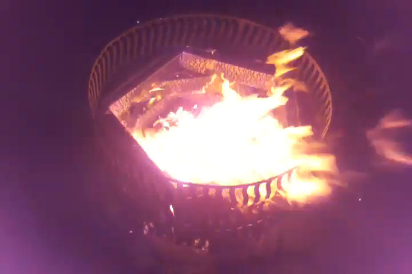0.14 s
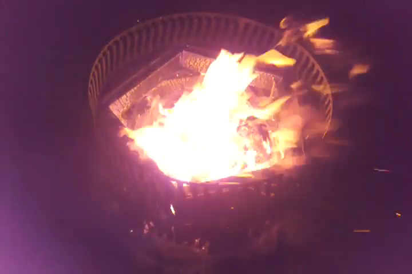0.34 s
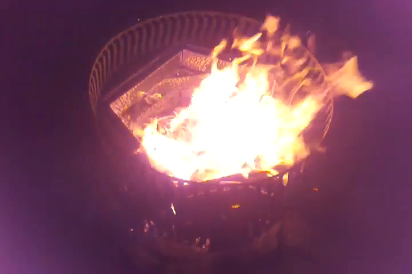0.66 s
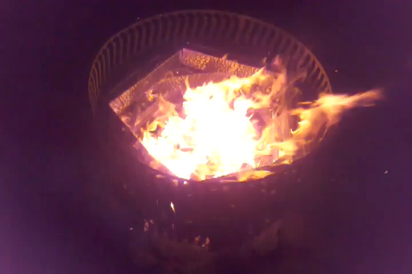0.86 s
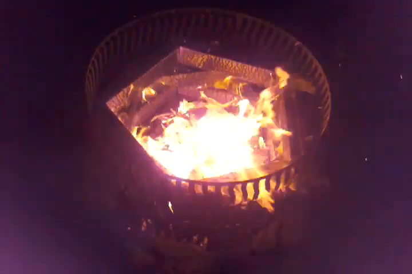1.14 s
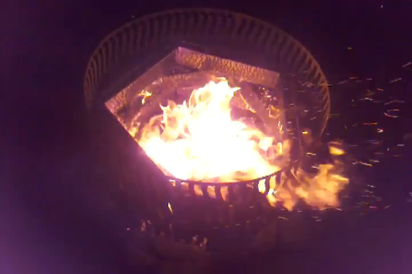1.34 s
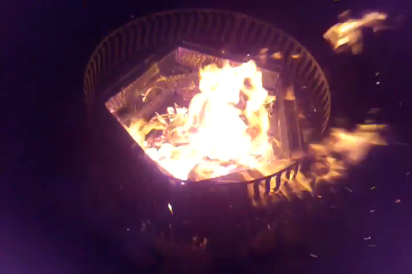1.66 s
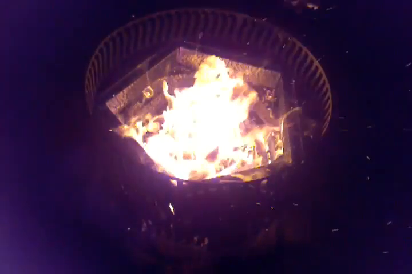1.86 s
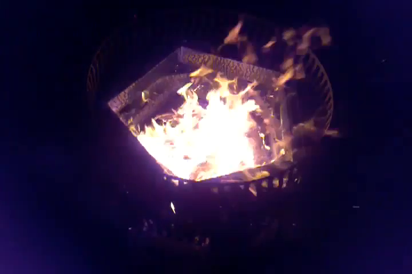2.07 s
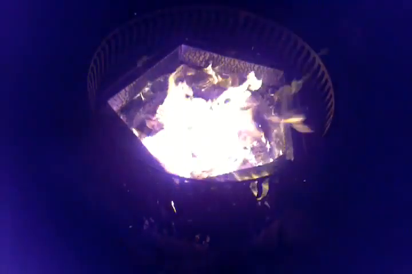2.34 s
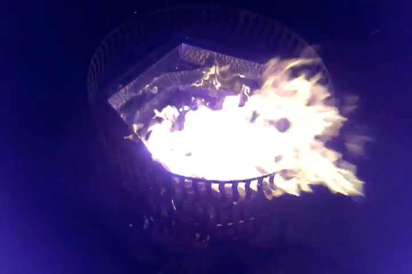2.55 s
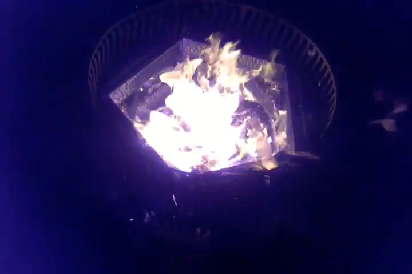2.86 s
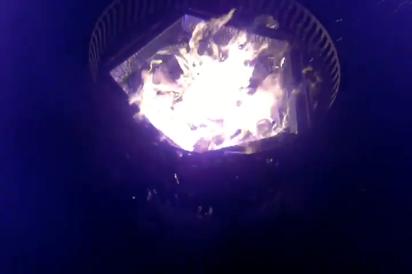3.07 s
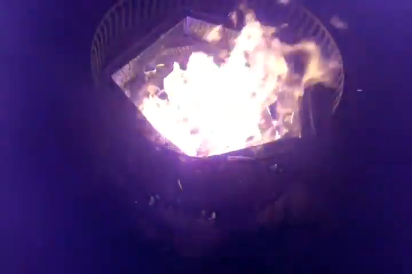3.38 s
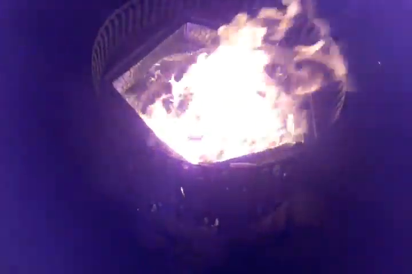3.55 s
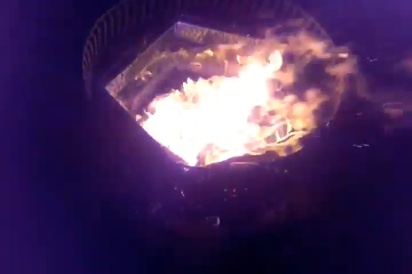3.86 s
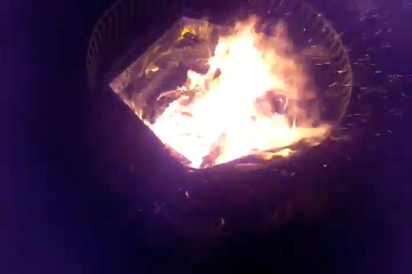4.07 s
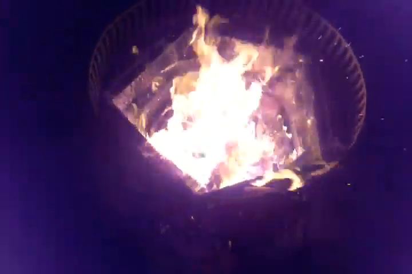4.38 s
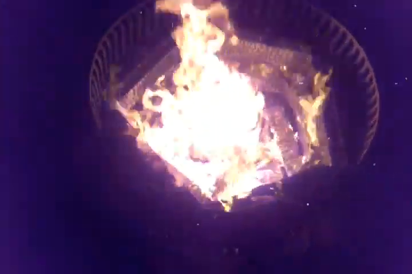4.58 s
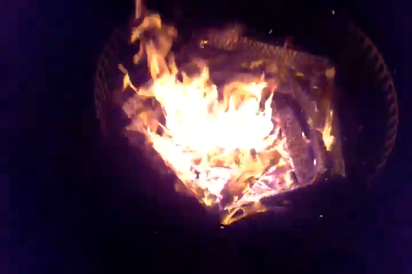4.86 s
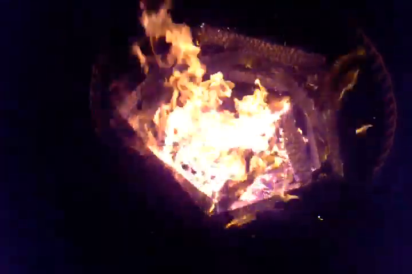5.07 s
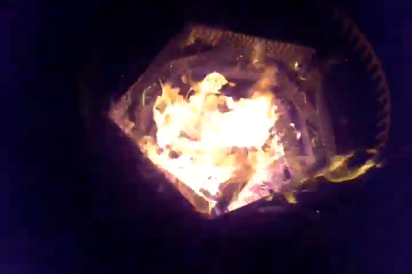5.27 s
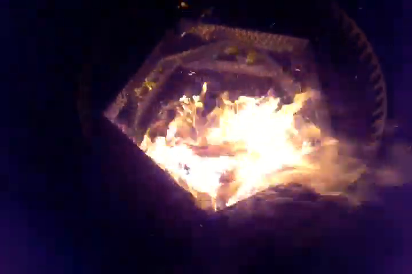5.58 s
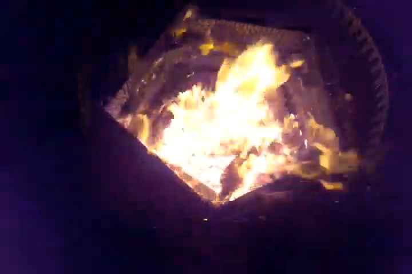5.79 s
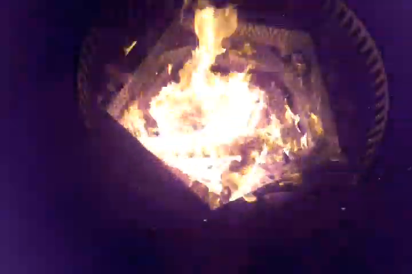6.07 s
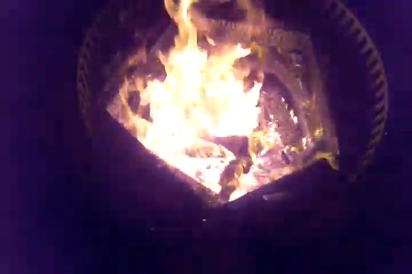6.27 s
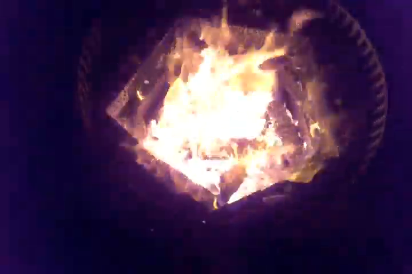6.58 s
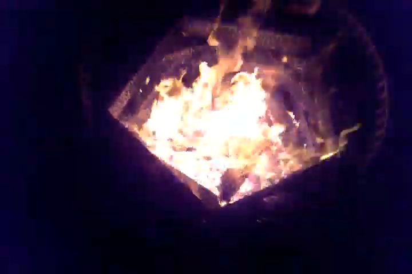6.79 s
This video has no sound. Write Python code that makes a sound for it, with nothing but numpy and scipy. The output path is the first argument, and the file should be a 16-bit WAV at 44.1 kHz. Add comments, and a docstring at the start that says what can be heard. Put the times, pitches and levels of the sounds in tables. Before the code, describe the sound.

Wind strikes a bare stereo microphone close to a burning wood fire outdoors, making irregular low rumbles, flapping thumps and short tearing puffs, heaviest in the middle. Beneath it are a weak low flame flutter and fine high sizzle that gradually grow. Sharp, very short cracks and tiny ticks come irregularly, more often toward the end, with small spurts of hiss. The space is open and nearly dry.

```python
"""Campfire in gusty wind

A wood fire burns in a metal ring outdoors: bursts of noise crack, ticks sizzle, bands of hiss jet
and fluttering low noise makes the flames. Wind buffets two microphone ports, one open and one shaded:
eddy noise read at a varying speed, single vortex thumps and tearing puffs.
Each channel is one port minus the delayed other."""
import sys
import numpy as np
from scipy import signal
from scipy.fft import rfft, irfft
from scipy.io import wavfile
from scipy.ndimage import uniform_filter1d, map_coordinates

SR = 44100
rng = np.random.default_rng(int(sys.argv[2]) if len(sys.argv) > 2 else 0)


def store_pcm(level_fs):
    """Save levels as 16-bit WAV."""
    pcm = np.round(np.clip(level_fs, -1, 1) * 32767).astype(np.int16)
    wavfile.write(sys.argv[1], SR, np.atleast_2d(pcm).T)


N = 305613
TIME = np.arange(N) / SR

# reference levels, offset by each source: (time [s], hiss level [dB], sizzle level [dB])
BED_LEVELS = [(0, -69.5, -80), (0.3, -68.5, -77.5), (0.8, -66.5, -77), (1.4, -63, -76), (2.1, -62, -73.5),
              (2.6, -60, -72.5), (3.1, -59, -68.5), (3.65, -56.5, -66), (3.85, -60, -73), (4.3, -59, -68.5),
              (4.75, -59.5, -70.5), (4.95, -56.5, -65.5), (5.3, -57, -70), (5.7, -58, -67.5),
              (6.1, -57, -68.5), (6.5, -57, -67.5), (6.93, -55, -65.5)]
# relative spectrum of small tearing eddies: (frequency [Hz], level [dB])
TEARING_SPECTRUM = [(200, -26), (500, 17), (900, 13.5), (1500, 1.5), (2200, -8), (3500, -22), (8000, -42.5)]


def gain_of(db):
    """Decibels to an amplitude factor."""
    return 10 ** (np.asarray(db) / 20)


def evened(x):
    """Scales to rms 1."""
    return x / np.sqrt(np.mean(x ** 2) + 1e-20)


def curves(rows):
    """Each column of a table, after the time column, as a curve over TIME."""
    time_s, *columns = np.transpose(rows)
    return [np.interp(TIME, time_s, column) for column in columns]


def read(points, hz):
    """Spectrum table at the given frequencies, interpolated over log frequency."""
    point_hz, level_db = np.transpose(points)
    return np.interp(np.log(hz + 1), np.log(point_hz + 1), level_db)


def add(mix, start_s, sound):
    """Adds a sound to the mix in place, cut at the end."""
    part = mix[max(round(start_s * SR), 0):][:len(sound)]
    part += sound[:len(part)]


def delayed(x, count):
    """Delays by a count of samples, keeping the length."""
    return np.concatenate([np.zeros(count), x[:len(x) - count]])


def coloured(x, points, size=1024):
    """Minimum-phase filter with the given spectrum: causal, so attacks stay sharp."""
    hz = abs(np.fft.fftfreq(size, 1 / SR))
    log_gain = np.log(gain_of(read(points, hz)))
    taps = np.fft.ifft(np.exp(signal.hilbert(log_gain).conj())).real
    return signal.oaconvolve(x, taps[:size // 2])[:len(x)]


def bass_cut(x, hz):
    """Second-order high-pass."""
    return signal.sosfilt(signal.butter(2, hz, "high", fs=SR, output="sos"), x)


def wander(rate_hz):
    """Smooth random curve of rms 1: noise under a Gaussian low-pass."""
    lowpass = np.exp(-(np.fft.rfftfreq(N, 1 / SR) / rate_hz) ** 2)
    return evened(irfft(rfft(rng.standard_normal(N)) * lowpass, N))


def hiss():
    """Self-noise of one microphone: coloured noise at the hiss level."""
    # relative: (frequency [Hz], level [dB])
    hiss_spectrum = [(50, 25.5), (600, -6), (2000, -10), (3800, -5), (5200, 0), (7000, 2), (10500, 4.5),
                     (14000, 5.5)]
    return gain_of(curves(BED_LEVELS)[0]) * evened(coloured(rng.standard_normal(N), hiss_spectrum))


def yard(x, echo_db=-31, tail_db=-28.5, t60_s=0.423):
    """Open air: one weak echo from nearby, then a thin decaying tail."""
    # colour of the echoes: (frequency [Hz], level [dB])
    air_colour = [(1000, -1.5), (3000, -0.5), (4500, -4.5), (8000, 4), (11000, -1.5), (14000, 6.5)]
    t = TIME[:SR // 2]
    echo = evened(rng.standard_normal(len(t)) * np.exp(-abs(t - .019) / 0.0011))
    tail = evened(rng.standard_normal(len(t)) * gain_of(-60 * t / t60_s) * (t > .006))
    response = (gain_of(echo_db) * echo + gain_of(tail_db) * tail) / np.sqrt(len(t))
    return signal.oaconvolve(x, coloured(response, air_colour))[:N]


def airflow():
    """Level [dB] and eddy rate [Hz]: gusts rise, hold and ebb over a swaying breeze, summed in power."""
    # breeze before its offset and sway: (time [s], level [dB])
    breeze_levels = [(0.0, -67), (0.39, -68.5), (1.1, -57.5), (1.19, -50), (1.56, -54), (1.83, -48),
                     (2.3, -55), (2.61, -56), (3.53, -48), (3.66, -49.5), (3.74, -56.5), (4.13, -55.5),
                     (4.92, -49.5), (5.58, -56), (6.54, -56.5), (6.93, -52.5)]
    # gusts: (start [s], hold [s], level at the hold [dB], eddy rate at the hold [Hz])
    gusts = [(0.017, 0.0401, -42, 146.8), (0.627, 0.0609, -31.5, 301), (0.724, 0.0369, -33, 322.5),
             (0.819, 0.0282, -36, 211.1), (0.953, 0.01243, -37, 170.3), (1.025, 0.01315, -35, 180.4),
             (1.056, 0.043, -26, 298.1), (1.172, 0.0563, -29.5, 194), (1.271, 0.0332, -27, 237.1),
             (1.327, 0.1608, -39, 176.4), (1.61, 0.0523, -33, 245.6), (1.679, 0.049, -33.5, 202.1),
             (1.762, 0.0309, -24.5, 302.9), (1.818, 0.0744, -26.5, 218.3), (1.895, 0.05065, -25, 268),
             (1.967, 0.0237, -29.5, 224.8), (2.093, 0.096, -34, 227.7), (2.247, 0.022, -30.5, 230.5),
             (2.271, 0.0137, -26, 232.3), (2.575, 0.0717, -36, 199.1), (2.782, 0.081, -34, 229.3),
             (2.982, 0.0565, -33, 296.9), (3.099, 0.046, -29, 240.6), (3.177, 0.063, -32.5, 245.2),
             (3.325, 0.0448, -33, 193.6), (3.394, 0.0184, -23.5, 219.7), (3.461, 0.1512, -28.5, 215.9),
             (3.648, 0.0417, -35, 249.6), (3.799, 0.038, -28, 319.8), (3.879, 0.076, -35.5, 210.6),
             (4.129, 0.0698, -25.5, 179.5), (4.316, 0.024, -33, 215.2), (4.404, 0.0191, -22.5, 229.8),
             (4.441, 0.02113, -22, 248.9), (4.494, 0.0422, -34.5, 190.2), (4.666, 0.0685, -24, 280.9),
             (4.784, 0.0567, -27.5, 321), (4.925, 0.031, -25.5, 215.1), (4.981, 0.0998, -36, 219.2),
             (5.146, 0.01204, -27, 250.8), (5.181, 0.048, -25.5, 264.8), (6.059, 0.025, -29.5, 234.5),
             (6.782, 0.0661, -34.5, 169.5)]
    breeze_offset_db, breeze_sway_db, breeze_eddy_hz = 10, 2.5, 185.12
    attack_s, release_s = 0.007002, .019
    eddy_law = .2  # exponent of eddy rate against gust amplitude

    breeze_db = curves(breeze_levels)[0] + breeze_offset_db + breeze_sway_db * wander(rate_hz=12.19)
    power = gain_of(breeze_db) ** 2
    weighted_hz = power * breeze_eddy_hz
    for start_s, hold_s, level_db, eddy_hz in gusts:
        rise = np.minimum(TIME - start_s, 0) / attack_s
        ebb = np.maximum(TIME - start_s - hold_s, 0) / release_s
        shape = np.exp(rise - ebb)
        gust = (gain_of(level_db) * shape) ** 2
        power = power + gust
        weighted_hz = weighted_hz + gust * eddy_hz * shape ** eddy_law
    return 10 * np.log10(power), weighted_hz / power


def wind(level_db=0.34, steepness=6.27, lumpy_db=2.0, swirl=.13, low_cut_hz=75):
    """A frozen pattern of eddies is blown past the port: the faster it passes, the brighter the rumble."""
    flow_db, eddy_hz = airflow()
    rest_hz = 400  # corner of the frozen pattern at unit read speed
    spectrum = (1 + (np.fft.rfftfreq(N, 1 / SR) / rest_hz) ** steepness) ** -.5
    eddies = irfft(rfft(rng.standard_normal(N)) * spectrum, N)

    lumps = wander(rate_hz=70.49)  # small swirls are both faster and stronger
    travel = np.cumsum(eddy_hz * np.exp(swirl * lumps)) / rest_hz
    passing = map_coordinates(eddies, [travel % (N - 1)], order=3)
    pressure = bass_cut(passing * gain_of(lumpy_db * lumps), low_cut_hz)

    # level out the slow swings, so that the airflow sets the level
    local_power = uniform_filter1d(uniform_filter1d(pressure ** 2, size=1100), size=800)
    return pressure / np.sqrt(local_power) * gain_of(flow_db + level_db)


def puffs(per_s=170, level_db=-23, spread_db=1.5, decay_s=0.00138):
    """Small eddies tear off at random: decaying noise puffs, louder with airflow level and eddy rate."""
    flow_db, eddy_hz = airflow()
    strengths = gain_of(spread_db * np.minimum(rng.exponential(1, N), 3))
    hits = strengths * (rng.random(N) < per_s / SR)
    envelope = signal.lfilter([1], [1, -np.exp(-1 / (decay_s * SR))], hits)
    tearing = evened(coloured(envelope * rng.standard_normal(N), TEARING_SPECTRUM))
    return gain_of(flow_db + level_db) * (eddy_hz / 300) ** 3 * tearing


def thumps(swing_trim_db=-8.5, core=2.682, wake_trim_db=-26, wake_decay_s=0.00254):
    """A passing vortex pulls, then pushes; the tighter its core, the sharper the flap. Its wake tears."""
    # levels before trims: (time [s], peak level [dB], nominal pitch [Hz], wake offset [dB])
    vortices = [(0.643, -27, 370, 5.5), (0.655, -21, 350, 7), (0.738, -29, 330, 10),
                (0.759, -18.5, 300, 4.5), (1.066, -12.5, 256, 7), (1.074, -18, 300, 3),
                (1.087, -20, 340, 16), (1.094, -14.5, 343, 6), (1.18, -10.5, 235.5, 0),
                (1.291, -16.5, 269, 7), (1.613, -11, 340.4, -6.5), (1.617, -21.5, 376, 10),
                (1.771, -17, 329, 5), (1.777, -4.5, 338, 1), (1.901, -17, 300, -3), (1.909, -19, 328, 6),
                (1.936, -12, 244.6, -9.5), (2.117, -20.5, 299.7, -0.5), (2.285, -8, 272.8, 1.5),
                (2.799, -9.5, 278.8, -1.5), (3.0, -14.5, 380.5, -5.5), (3.012, -15, 289.9, -13),
                (3.148, -13.5, 279.8, -3), (3.396, -13, 289.3, 3), (3.4, -9, 226.4, 4.5),
                (3.5, -13.5, 296.3, -0.5), (3.826, -5.5, 398.1, 1), (4.166, -25, 169.6, -9.5),
                (4.2, -9, 197.2, -7.5), (4.406, -7, 290, 8.5), (4.419, 0.5, 231.3, 4),
                (4.449, -10.5, 342.9, 7), (4.462, -13, 247.6, 4), (4.669, -11, 311.3, 2.5),
                (4.689, -7.5, 338, -12), (4.735, -23.5, 277.9, -15.5), (4.792, -11, 270.4, -14.5),
                (4.815, -30, 331.2, 8), (4.833, -27.5, 278.9, -2.5), (5.115, -11.5, 219.6, -8.5),
                (5.153, -13.5, 258.4, 5.5), (5.198, -7, 200.5, 3.5), (5.205, -15.5, 320, 4),
                (6.067, -19, 318, -7)]
    out, wake = np.zeros(N), np.zeros(N)
    t = TIME[:1764] - .02  # centred on the vortex
    wake_decay = np.exp(-TIME[:len(t) * 2] / wake_decay_s)
    for time_s, peak_db, hz, wake_db in vortices:
        phase = t * 2 * np.pi * hz
        swing = phase / (1 + (phase / core) ** 2) ** 3
        add(out, time_s + t[0], gain_of(peak_db + swing_trim_db) * swing / swing.max())
        wake_gain = gain_of(peak_db + wake_trim_db + wake_db) * (hz / 280) ** 2
        add(wake, time_s, wake_gain * wake_decay)
    return out + coloured(wake * rng.standard_normal(N), TEARING_SPECTRUM)


def flames(over_hiss_db=14, flutter_db=-0.4451):
    """The low rush of burning gas, fluttering as the flames lick."""
    # relative: (frequency [Hz], level [dB])
    flame_spectrum = [(40, -12), (110, 5), (250, 1.5), (450, -7.5), (800, -16.5), (1300, -22), (2200, -29),
                      (4000, -56), (8000, -53)]
    rush = evened(coloured(rng.standard_normal(N), flame_spectrum, size=4096))
    return rush * gain_of(curves(BED_LEVELS)[0] + over_hiss_db + flutter_db * wander(rate_hz=19.5))


def ticks(per_s, spread_db, decay_s):
    """Tiny decaying bursts at random times, of random strength and sign, scaled to rms 1."""
    strengths = gain_of(spread_db * np.minimum(rng.exponential(1, N), 4)) * rng.choice([-1, 1], N)
    hits = strengths * (rng.random(N) < per_s / SR)
    t = TIME[:400]
    burst = rng.standard_normal(len(t)) * np.exp(-t / decay_s)
    burst = irfft(np.exp(1j * np.angle(rfft(burst))))  # phase kept, spectrum flattened
    return evened(signal.oaconvolve(hits, burst)[:N])


def sizzle(fizz_db=6.0, tick_db=-2, surge_db=1.47):
    """Boiling sap fizzes in little surges (dense ticks), and embers tick (sparse ones)."""
    # (frequency [Hz], level [dB])
    sizzle_spectrum = [(800, -18), (2200, -1), (4000, 7.5), (5200, -10.5), (7000, -10), (8800, 12),
                       (10600, -1), (12000, 15.5), (14000, -33.5)]
    surge = gain_of(fizz_db + surge_db * wander(rate_hz=4.7))
    fizz = surge * ticks(per_s=1200, spread_db=-1.0, decay_s=0.000838)
    embers = gain_of(tick_db) * ticks(per_s=140, spread_db=12.0, decay_s=0.0023)
    return gain_of(curves(BED_LEVELS)[1]) * coloured(fizz + embers, sizzle_spectrum)


def jets(relative_width=0.405):
    """Steam or gas escapes through a split in a log: a band of hiss that swells and fades."""
    # level before the swell: (start [s], length [s], level [dB], centre [Hz])
    escapes = [(1.612, 0.0416, -58, 11910), (3.512, 0.0352, -54, 1404), (4.928, 0.0856, -59, 1904),
               (5.178, 0.0345, -55, 12520), (5.818, 0.0561, -55, 1919), (6.49, 0.0488, -49.5, 11490)]
    out = np.zeros(N)
    for start_s, length_s, level_db, centre_hz in escapes:
        t = np.arange(0, length_s, 1 / SR)
        hz = np.fft.rfftfreq(len(t), 1 / SR)
        band = np.exp(-((hz / centre_hz - 1) / relative_width) ** 2)
        rush = evened(irfft(rfft(rng.standard_normal(len(t))) * band, len(t)))
        add(out, start_s, gain_of(level_db) * rush * np.sin(np.pi * t / length_s))
    return out


def log_ring(hz, detune=0.036):
    """Response of a splitting log: a direct path plus resonances, detuned together at every call."""
    # before detuning: (centre [Hz], width [Hz], level against the direct path [dB])
    log_modes = [(1159, 200, -2.5), (1712, 216, -10.5), (2199, 150, -4.5), (3744, 315, -2.5),
                 (4302, 390, -3), (6846, 270, -12), (10920, 570, -8), (13040, 860, 2)]
    detuned = hz * (1 + detune * rng.uniform(-1.02, 1))
    return 1 + sum(gain_of(db) / (1 + 2j * (detuned - centre) / width) for centre, width, db in log_modes)


def crack(level_db, low_db, high_db, top_db, length_ms, snap=3.49, scatter=4.3, stretch=1.66,
          rise_s=0.000188, size=1024):
    """A gas pocket bursts: a snap scatters among the logs and echoes off the ring; deep pops ring the log."""
    wall_s, wall_spread, wall_deep, wall_bright = .00174, 0.05, 0.395, 0.285  # delay, its scatter, gains
    t = np.arange(size) / SR
    deep = top_db < -4.5

    burst = evened(rng.standard_normal(size) * np.exp(-t / 0.00012))
    direct = burst + snap * np.sign(burst[0]) * evened(1. * (t == 0))
    decay_s = .0005 + stretch * max(length_ms, .3) / 1000
    scatter_shape = (1 - np.exp(-t / rise_s)) * np.exp(-t / decay_s)
    source = direct + scatter * evened(rng.standard_normal(size) * scatter_shape)
    echo = delayed(source, int(SR * wall_s * (1 + wall_spread * rng.uniform(-1.9, 1))))

    z = rfft(source + (wall_deep if deep else wall_bright) * echo)
    z /= np.sqrt(uniform_filter1d(abs(z) ** 2, size=61))  # white overall, fine ripple kept
    if deep:
        z = z * log_ring(np.fft.rfftfreq(size, 1 / SR))
    faded = irfft(z) * (1 - (t / t[-1]) ** 2)

    dull_db = 0.78 * max(level_db + 44.0, 0)  # the biggest pockets lose the very top
    colour = [(300, low_db - 1), (1500, low_db), (4000, 0), (7200, high_db), (11500, top_db),
              (13500, top_db - dull_db), (16000, top_db - 30)]
    sound = coloured(faded, colour)
    return gain_of(level_db) * sound * np.sqrt(SR / 100 / np.sum(sound ** 2))  # energy as rms over 10 ms


def cracks():
    """The cracks of the logs, from loud pops to faint ticks, each burst computed afresh."""
    # before port colour; colour against 4 kHz; length is stretched in crack():
    # (time [s], level over 10 ms [dB], at 1.5 kHz [dB], at 7.2 kHz [dB], at 11.5 kHz [dB], length [ms])
    crack_rows = [(0.2967, -68.5, -6, 3.5, 14, .8), (0.4971, -59.5, -1.5, -19, -4.5, 0.77),
                  (0.638, -62, -7.5, -9.5, -7.5, 0.815), (0.8766, -36, -5.5, -10.5, -11.5, 1.57),
                  (0.93, -59.5, -4, 8, 4, .9), (0.9382, -59.5, -3, 6.5, 6, 1.2),
                  (0.948, -50, 1.5, 0, 2.5, 0.67), (1.0502, -50, -4, 5, 18, 1.14),
                  (1.0574, -29.5, -1, -1.5, -11, 1.16), (1.2, -36, 1.5, 11.5, -1.5, 0.73),
                  (1.2252, -62, 1.5, 12, 1, .8), (1.344, -56.5, -23, -3, -3.5, 0.586),
                  (1.4405, -44, -8.5, -3.5, 0.5, 1.3), (1.5203, -36, -12.5, 0.5, -11.5, 1.282),
                  (1.5795, -43, -12, -8, 3, 0.963), (1.6578, -36, -10.5, -6.5, -4, 0.2514),
                  (1.7685, -41.5, 16.5, -7.5, -2.5, 2.6), (1.8078, -56, 1, -1.5, 0.5, 1.05),
                  (2.303, -55, 4.5, 9.5, 7.5, 1.104), (2.3846, -51.5, -0.5, 8, 4.5, 0.819),
                  (2.5849, -42, -17, 2.5, 6, 0.85), (2.589, -46.5, -17.5, 1, 5.5, 0.842),
                  (2.6276, -53.5, 6.5, 0.5, 0.5, 0.89), (2.8118, -44.5, -12.5, 5, 8.5, 1.462),
                  (2.8652, -44, -9.5, 0.5, 13, 1.178), (2.913, -52.5, -10, 4.5, 12, 2.6),
                  (2.9347, -57.5, -10, 2, 10.5, 0.753), (2.9656, -52, -0.5, 2, 1, 0.706),
                  (3.115, -47.5, 3.5, 3.5, 10, 0.937), (3.3183, -53.5, -9.5, -10, -2, 0.883),
                  (3.432, -47, -7.5, 9.5, 3, 0.688), (3.4992, -53.5, -7.5, 3, -13, 0.737),
                  (3.6, -26.5, -6, -2.5, 1, 1.384), (3.7086, -15, -4.5, -7.5, -6.5, 0.907),
                  (3.8834, -52, 6.5, -2.5, 3, 0.926), (4.3204, -55.5, -2.5, 9.5, 14.5, 1.01),
                  (4.3622, -41.5, 6, -8, -1.5, 2.08), (4.4324, -45, 8, 10, 2.5, 1.79),
                  (4.4852, -34, 4, 2, 15.5, 0.847), (4.5491, -45, -6, -12.5, -4.5, 0.7554),
                  (4.9172, -54.5, 0.5, -6, 5, 0.947), (5.0642, -40, -5, -3.5, -3.5, 0.612),
                  (5.0867, -39, 3, -19.5, -9.5, 1.115), (5.0996, -33.5, -8.5, -0.5, 2, 1.703),
                  (5.1774, -34.5, 6, 14, 14, 1.173), (5.2543, -49.5, -14.5, 3.5, -8, 1.19),
                  (5.3798, -46.5, -16, -4.5, -5, 0.704), (5.4063, -50, 2, 4.5, -1, 2.28),
                  (5.452, -32.5, 3, 5.5, 16, 0.607), (5.598, -40.5, -9, 3.5, 7.5, 1.6),
                  (5.605, -46, -7, 7.5, 8, 1.42), (5.6439, -21, -12, -1.5, -8, 0.884),
                  (5.782, -47, -21, -4, 3, 0.872), (5.8048, -46.5, -2.5, 0, -3.5, 2.21),
                  (5.876, -44.5, -0.5, 3, 2, 1.74), (5.8945, -28.5, -5.5, 2.5, -15, 0.868),
                  (6.003, -47.5, -11, 11, 10, 1.07), (6.0504, -52.5, -8.5, 2.5, 6.5, 0.956),
                  (6.0758, -30, -11.5, 2, 6.5, 0.893), (6.14, -46, -18.5, -8, -7.5, 0.929),
                  (6.1571, -55.5, -3.5, -1.5, 11, .7), (6.2231, -32.5, -10.5, -2, -7, 0.632),
                  (6.3188, -38, 1.5, 11, 9.5, 0.833), (6.3263, -42.5, -1.5, 1, -1, 0.853),
                  (6.4262, -42.5, 1, -0.5, -9.5, 0.97), (6.4572, -51, -2, 1.5, 8, .9),
                  (6.4855, -38, -13.5, -8, 1, 1.32), (6.4955, -27.5, -16, -3.5, 8.5, 0.714),
                  (6.5748, -49.5, 10, 10, 10.5, 1.06), (6.6207, -52, -6.5, -6, -4, 1.098),
                  (6.7473, -54.5, -8, -2, 1, 0.94), (6.7579, -49.5, -4.5, -4, -2.5, 0.99),
                  (6.7778, -39.5, -3.5, -1, 2, 1.05)]
    out = np.zeros(N)
    for time_s, *settings in crack_rows:
        add(out, time_s, crack(*settings))
    return out


def scene():
    """Pressure at two ports; the shaded one hears the fire duller and later, and weaker wind of its own."""
    # colour of the cracks at close range: (frequency [Hz], level [dB])
    port_colour = [(200, -8), (600, -0.5), (1300, -0.5), (2900, 0.5), (4000, -1.5), (5400, -7.5),
                   (7000, -1.5), (8700, -1), (10600, 1), (12000, 3.5), (13500, -1)]
    # fire at the shaded port against the open one: (frequency [Hz], level [dB])
    shade_colour = [(100, -5), (500, -5.5), (1100, -5), (2000, -17.5), (5000, -44.5), (14000, -12)]
    lee_db = -9.5  # wind at the shaded port

    snaps = cracks()
    fire = coloured(snaps, port_colour) + sizzle() + jets() + flames()
    open_port = fire + bass_cut(wind() + thumps() + puffs(), hz=83.8)
    shaded_port = delayed(coloured(fire, shade_colour), count=1) + gain_of(lee_db) * wind()
    return np.array([port + yard(snaps) + hiss() for port in (open_port, shaded_port)])


def record(dry):
    """Subtracts the other port, delayed and brighter, to widen the image; then clips and band-limits."""
    # colour of the subtracted port: (frequency [Hz], level [dB])
    cross_colour = [(2900, 0), (4200, 0.56), (5800, 2.3), (9000, 1.78), (14000, 0.9)]
    port_delay_s, edge_hz, clip_level = .000343, 14000, .85
    hz = np.fft.rfftfreq(N + SR, 1 / SR)
    path = gain_of(read(cross_colour, hz)) * np.exp(-2j * np.pi * hz * port_delay_s)
    crossed = irfft(rfft(dry[::-1], N + SR) * path, N + SR)[:, :N]
    overloaded = np.clip(dry - crossed, -clip_level, clip_level)
    lowpass = signal.firwin(301, edge_hz, window=("kaiser", 8), fs=SR)
    return signal.oaconvolve(overloaded, lowpass[None], "same", axes=1)


dry = scene()
out = record(dry)
store_pcm(out)
```